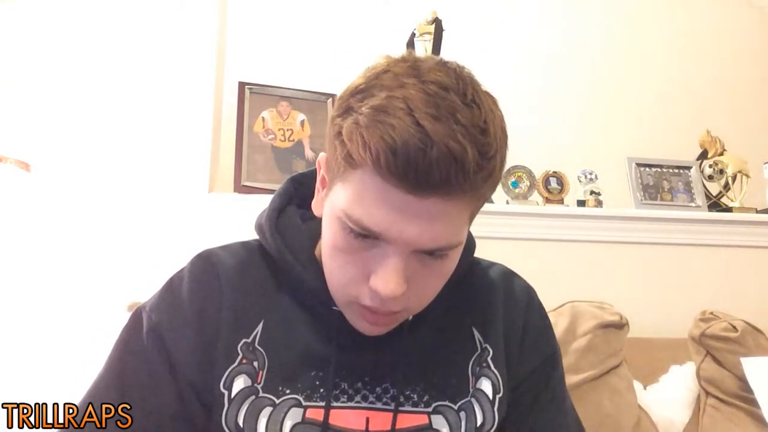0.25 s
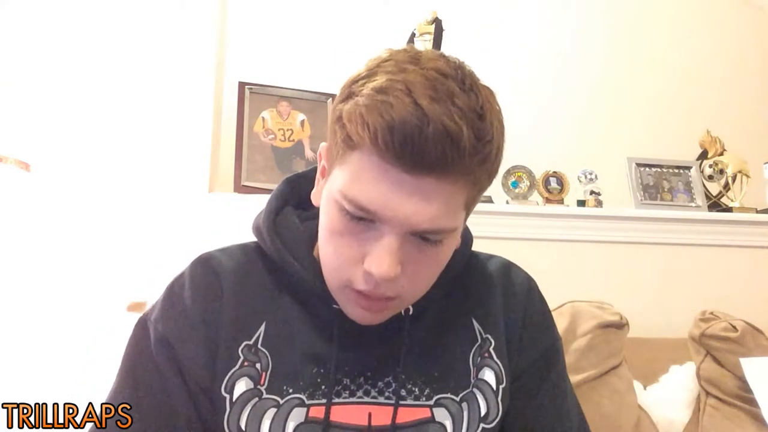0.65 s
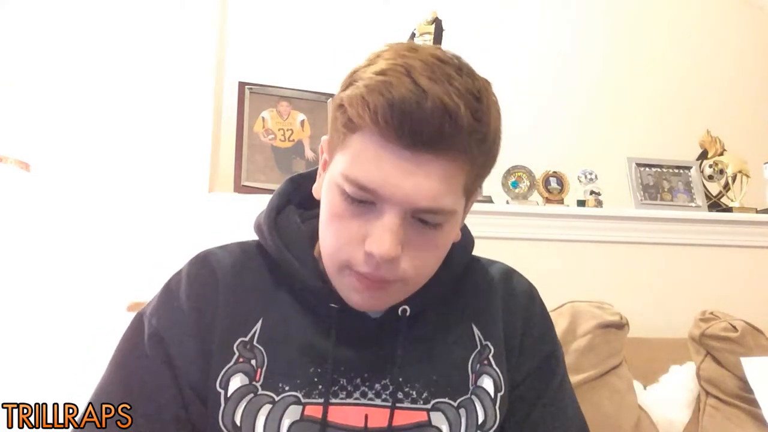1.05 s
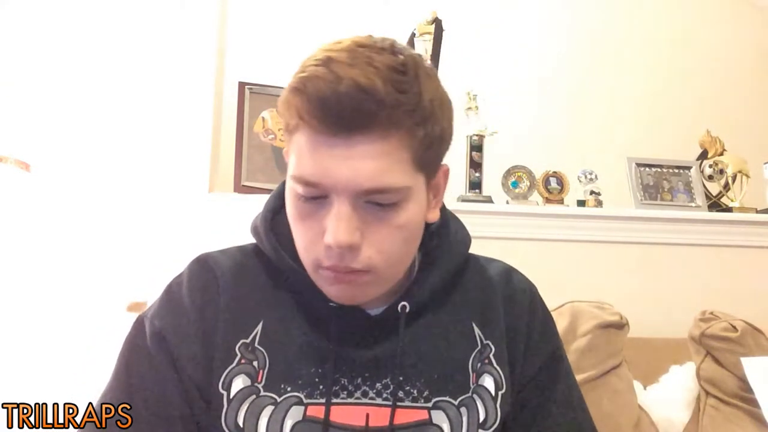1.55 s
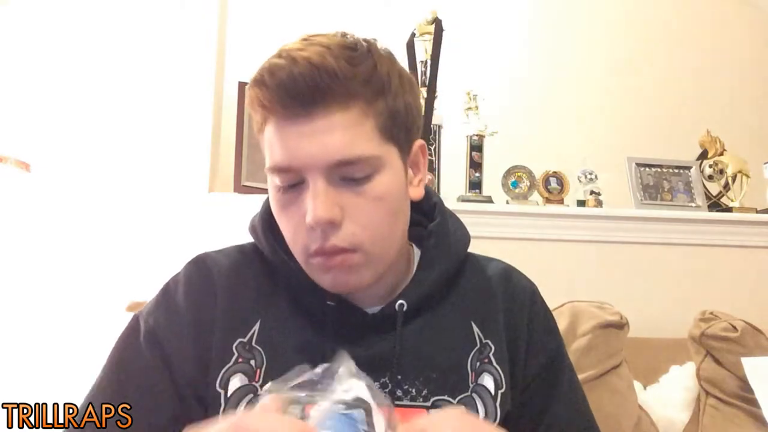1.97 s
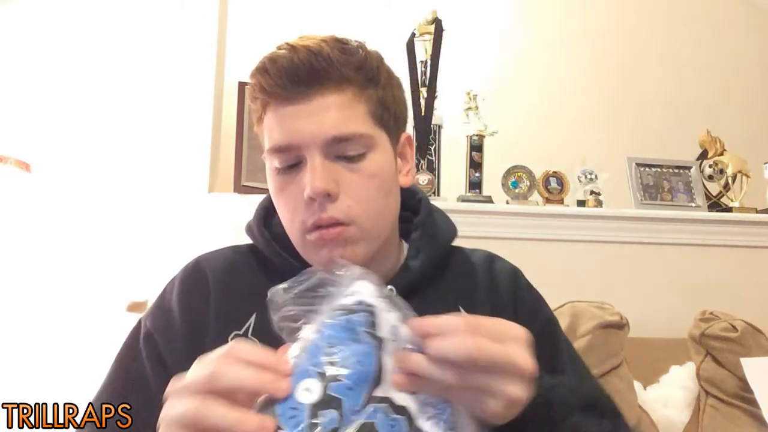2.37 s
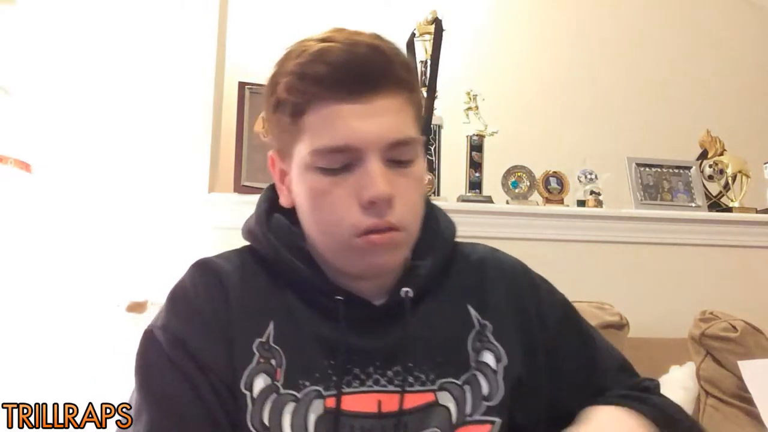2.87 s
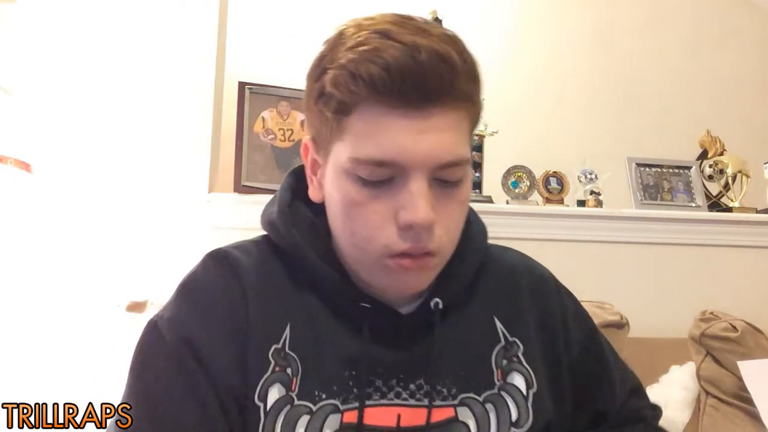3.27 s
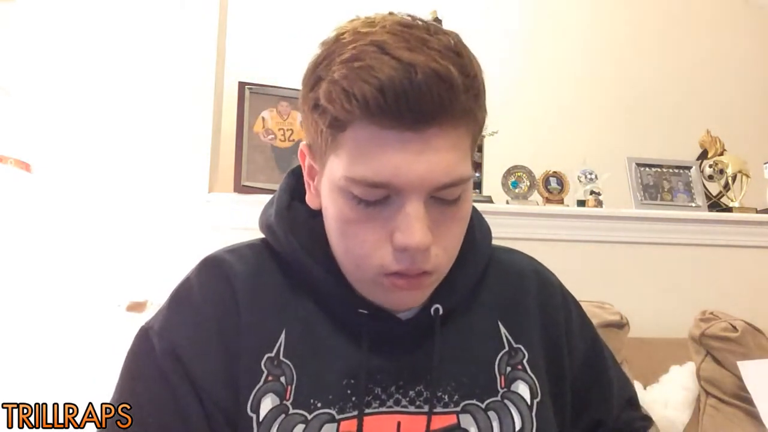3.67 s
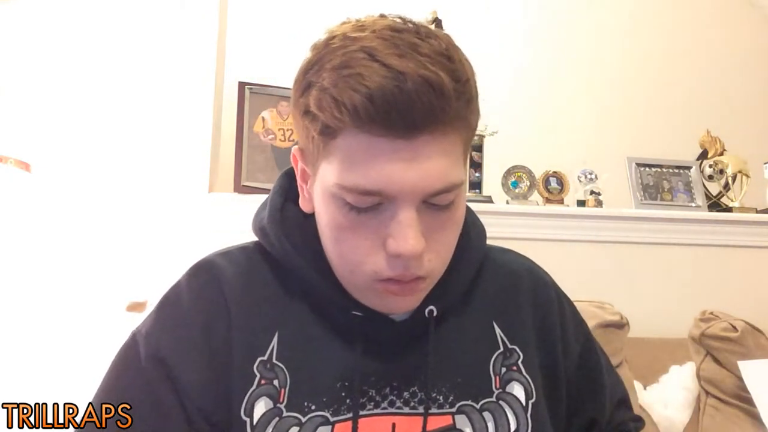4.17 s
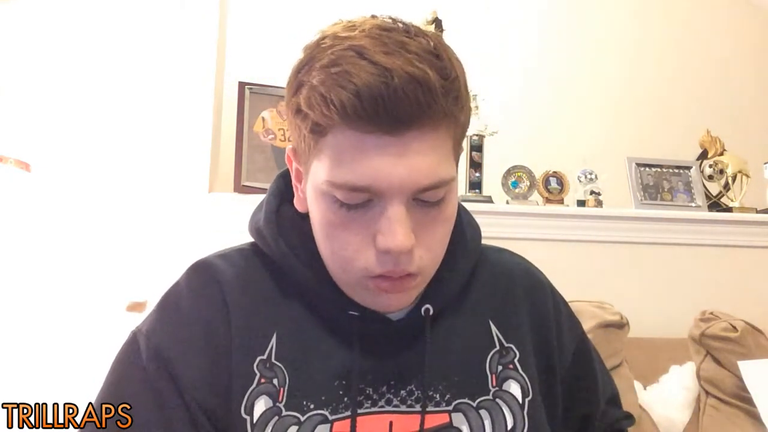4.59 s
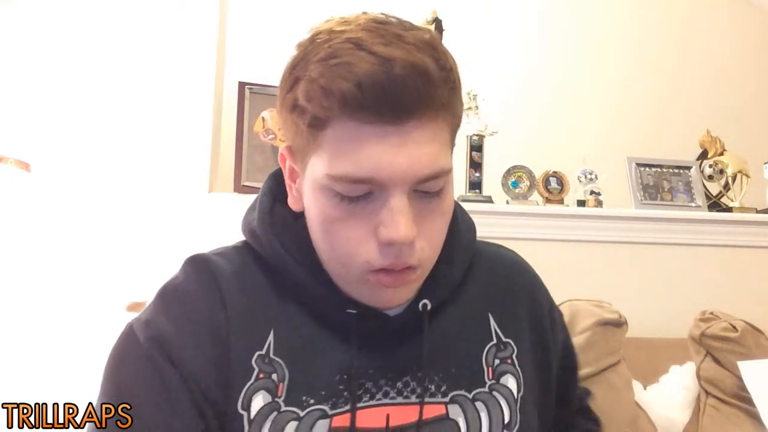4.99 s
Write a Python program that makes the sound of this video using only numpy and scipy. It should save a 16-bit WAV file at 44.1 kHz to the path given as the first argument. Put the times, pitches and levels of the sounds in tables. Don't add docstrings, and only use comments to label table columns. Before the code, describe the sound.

Brittle plastic film crackles irregularly within arm's reach in a furnished room with a short, faint reverberation. Sparse creases build to a sharp burst, a dense zipping tear follows, and contents knock dully as the bag is turned over. A peeling rustle leads into two crunchy squeezes with hollow thumps, before quiet fidgeting fades towards near stillness. Faint mains hum and microphone hiss stay underneath.

```python
import sys
import numpy as np
from scipy import signal
from scipy.fft import rfft, irfft
from scipy.io import wavfile

SR = 44100
rng = np.random.default_rng(int(sys.argv[2]) if len(sys.argv) > 2 else 0)


def invert_db(level):
    return 10 ** (np.asarray(level, dtype=float) / 20)


def output_pcm(signal):
    pcm = np.clip(np.atleast_2d(signal).T, -1, 1) * 32767
    wavfile.write(sys.argv[1], SR, np.round(pcm).astype(np.int16))


N = 230942

# [s, dB, dB, dB]
CREASES = [(0.0278, -28.5, -12, -26), (0.0914, -26, -6, -4.5), (0.1646, -30.5, 0, -7),
           (0.1836, -30, 0, -14.5), (0.2699, -39, 3, -11), (0.3294, -29.5, -3.5, -25.5),
           (0.4366, -14.5, -6.5, -41), (0.4753, -9.5, -7.5, -20.5), (0.5112, -6, -8, -28),
           (0.5902, -9.5, -19, -27), (0.6069, -14, -9.5, -36), (0.6566, -23.5, -0.5, -38),
           (0.6827, -39.5, 8, 11), (0.7247, -24.5, -7, -29), (0.7485, -23.5, -5, -38),
           (0.7726, -20, -21, -25), (0.7825, -6.5, -2, -18), (0.7867, 0, -2, -25), (0.9089, -18.5, -4, -13),
           (0.9836, -23.5, -19, -16.5), (1.0333, -31, 0.5, -16), (1.0542, -25, -12, -61),
           (1.1445, -17.5, 2, -2.5), (1.2197, -22.5, 5, -2), (1.2735, -27.5, 2.5, -21),
           (1.2963, -27, 0, -21), (1.3546, -29.5, -19, -11.5), (1.4371, -25, -26, -34),
           (1.4721, -20.5, -2, -30), (1.4939, -21, -6, -29),
           (1.7847, -9, 2.5, -3.5), (1.7946, -5, -6, -8), (1.812, -2, -10, -11), (1.8436, -5, -7.5, -12.5),
            (1.8975, -22, -17, -28), (1.9187, -8.5, 1, -7), (1.9667, -24, -20, -30), (1.979, -29, -7, -13),
            (2.0018, -28, -29, -6), (2.0767, -20.5, -23, -8), (2.1003, -25, -26, -11),
            (2.1055, -20, -7, -17.5), (2.1448, -28, 8.5, -7), (2.188, -30, -13, -10), (2.2088, -35, 1, -25),
            (2.2259, -32, -12, -24), (2.2388, -20.5, -1.5, -29), (2.2937, -35, -1, -2),
            (2.353, -28.5, -1.5, -10), (2.458, -26, 0, -29), (2.491, -25, -4, -34),
            (2.531, -24.5, 1.5, -16), (2.5974, -22, -29, -9.5), (2.6198, -21, -13, -19),
            (2.6803, -44, -2, -20), (2.7107, -28, -16, -22), (2.787, -31.5, -17, -6),
           (3.0742, -7, -17, -14.5), (3.083, -13, 4, -21), (3.1046, -16, -21, -40),
            (3.6363, -26, -15, -22), (3.6641, -4.5, -6, -26.5), (3.669, -12, -5, -24.5),
            (3.7915, -15.5, 4.5, -11.5), (3.9955, -28.5, 5.5, -5), (4.028, -24, -13, -19),
            (4.0334, -24, -15, -32), (4.0698, -35, -11, -23), (4.1226, -31.5, -20, -22),
            (4.139, -26.5, -1, -30), (4.1618, -24, -12, -19), (4.1787, -14.5, 1, -4.5),
            (4.2545, -31, -1, -19), (4.321, -26, -30, -26), (4.3582, -27.5, 6, -14), (4.639, -20.5, 5, 3),
            (4.7213, -35.5, -1, -19), (4.75, -35, -23, -11), (4.8134, -30.5, 10, -10),
            (4.9984, -42, -14, -1), (5.176, -26.5, -11, -26),
           (0.7587, -26, -20, -20), (0.7807, -1, 1, -20), (0.791, -4, -4, -11), (0.7961, -8, -2, -9),
        (0.806, -2, -1, -15.5), (0.81, -10, -5, -9), (0.8164, -4, -3.5, -13), (0.8244, -9.5, 6, -10),
        (0.8278, -5, -1, -4), (0.8381, -6.5, 2, -11), (0.862, -14.5, -6, -13), (1.733, -11, 0, -9),
        (1.7381, -4, -8, -21), (1.7517, -6, -6, -8.5), (1.7592, -5, -8, -11.5), (1.7647, -6, -1, -10),
        (3.124, -10, 1, -4.5), (3.1351, -4, -20, -13), (3.1467, -2.5, -11, -19),
        (3.1529, -15.5, 11.5, -1.5), (3.1643, -8, 0, -38), (3.1724, -6, -1, -4.5), (3.182, -9.5, 3, -2.5),
        (3.677, -16, -17, -22.5), (3.6826, -17, -7, -34), (3.689, -22, 0, -28),
           (0.078, -35, 2, -17), (0.2947, -38.5, 5, -16), (0.465, -25, -20, -28), (0.523, -27, -10.5, -27),
         (0.582, -28, -9.5, -26), (0.5967, -15, -20.5, -26), (1.136, -33.5, 5, 5), (1.207, -32, -1, 2.5),
         (1.259, -28, 2, -17), (1.5163, -33.5, 8.5, -8.5), (1.55, -31, -11, -29), (2.639, -33.5, 7, 4),
         (3.059, -34, 15, -0.5), (4.63, -30, 6, 2),
           (1.553, -16, -13, -40), (1.5586, -19.5, -15, -22), (1.5617, -13, -12, -39),
        (1.5652, -20.5, -4, -31), (1.5752, -13.5, -6, -45), (1.5774, -31, -7, -17), (1.5804, -20, -24, -32),
        (1.5864, -25, 5, -23), (1.5895, -27, -17, -31), (1.5942, -21, 4, -27), (1.6004, -12.5, -2, -32),
        (1.6066, -11, -21, -30), (1.611, -16, -21, -27), (1.616, -25, 10, -26), (1.6184, -9, -23, -28),
        (1.6251, -10, -1, -34), (1.6306, -4.5, -23, -26), (1.6342, -18, -5, -40), (1.6377, -12, -28, -20),
        (1.6451, -4, -17, -22), (1.65, -7, -9, -35), (1.6533, -10, 3, -30), (1.6561, -21, -15, -22),
        (1.659, -8, -10, -30), (1.6629, -17.5, -19, -25), (1.6668, -12, -6, -21), (1.6697, -18, 1, -31),
        (1.6731, -32, -7, -21), (1.6756, -15, 2, -36), (1.6798, -4, -4, -23), (1.685, -16, -3, -23),
        (1.6879, -12, -15, -27), (1.691, -18, -24, -31), (1.6942, -12, -22, -37), (1.6995, -6, -26, -27),
        (1.7028, -22, -21, -40), (1.7075, -12, -26, -32), (1.7105, -32, -10, -13), (1.7134, -22, 3, -9),
        (1.7157, -13, -17, -14), (1.721, -3.5, -13, -25), (1.7252, -21, 20, -8), (1.7448, -17, 14, -14),
        (1.767, -31, -4, -20), (1.7727, -15, -9, -15), (1.778, -30, -8, -15),
           (2.8006, -17, -22, -37), (2.8048, -19.5, -6.5, -28), (2.8117, -23, -7, -36), (2.818, -20, -10, -38),
        (2.8219, -24, -17, -36), (2.828, -23, -6, -32), (2.8323, -12.5, -6, -31), (2.839, -18.5, -15, -46),
        (2.842, -24, -15, -9), (2.8453, -19, 0, -11), (2.854, -21, -9, -29), (2.862, -19.5, -7, -23),
        (2.8732, -19.5, -11, -10), (2.8785, -18, -5, -14), (2.8808, -23, -9, -31), (2.8893, -15, -18, -19),
        (2.8981, -31, -15, -24), (2.9209, -18, -18, -27), (2.9264, -25, -6, -23), (2.9475, -11, -27, -20),
        (2.9542, -20, -4, -36), (2.9596, -25, -17, -28), (2.962, -12.5, -22, -34), (2.9652, -17, -21, -34),
        (2.9673, -16, -3, -29), (2.9723, -22, -18, -34), (2.976, -16, -5.5, -24), (2.9843, -15, -19, -21),
        (2.9882, -10.5, -18, -30), (2.9914, -18, -16, -33), (2.9935, -22, -14, -13), (2.9976, -21, -9, -37),
        (3.001, -21, -3, -20), (3.0057, -32, -10, -44), (3.0101, -21, -16, -28), (3.014, -20, -4, -22),
           (0.7993, 0, -0.5, -28), (0.803, -7, -2, -22), (0.8119, -17, -13, -27), (0.8184, -8, -1, -23),
         (0.8206, -12, -10, -37), (0.8315, -6, -1, -22), (0.835, -14, -6, -8), (0.8412, -14, 5, -15),
         (3.697, -7.5, -13, -25), (3.7025, -13, -19, -35), (3.706, -8, 1.5, -13), (3.71, -8, -8.5, -24),
         (3.7116, -19, -8, -20), (3.7142, -5, -6, -29), (3.718, -9.5, -0.5, -14), (3.7209, -14, -19, -30),
         (3.7244, -19, -9, 4), (3.7276, -10, -7, -12), (3.731, -15, -3, -13), (3.7352, -5, -4.5, -16),
         (3.7385, -16, -7, -26), (3.7425, -10, -3.5, -17), (3.7486, -11, -6.5, -6), (3.756, -16, 0, -19),
         (3.762, -13, 3.5, -15), (3.7642, -18, -17.5, -6), (3.7719, -18, -8, 0), (3.7762, -21, -10, -3),
         (3.782, -19, -7.5, -1), (3.7847, -24, -2, -15), (3.7871, -32, -14, -31), (3.796, -30, -4, -1),
         (3.7988, -27, -1, -8), (3.8003, -28, -12, -15), (3.8055, -32, 7, -27), (3.8078, -16.5, -2.5, -20),
         (3.8137, -29, -7, -3), (3.8152, -29, 8, -8),
           (1.9613, -26, -21, -22), (1.9849, -30, -8, -13), (2.0138, -24.5, -20, -15),
          (2.022, -28, -13, -26), (2.0409, -21, -16, -7), (2.0457, -28, -19, -10), (2.0957, -37, -15, -24),
          (2.1086, -28, 1, -9), (2.1196, -27, -12, -23), (2.129, -28, 3, -8), (2.1394, -31, 3, -17),
          (2.166, -25, -5, -6), (2.2424, -37, -3, -2), (2.2477, -22, -8, -15), (2.2521, -29, -8, -11),
          (4.3338, -33, -18, -16), (4.3406, -32, -13, -16), (4.3543, -24.5, -12, -33),
          (4.4467, -36, -9, -22), (4.451, -37, -8, -22), (4.459, -34, -5, -23), (4.4717, -38, -7, -6),
          (4.503, -39, -14, -13), (4.511, -28, -3, -12), (4.5203, -29, -11, -25), (4.5299, -34, -13, -22)]
# freq_hz [Hz], level_db [dB per Hz]
CRACK = [(2600, -5), (3500, -1.5), (5200, 0), (7600, -0.5), (8500, -12)]
# freq_hz [Hz], level_db [dB per Hz]
SIZZLE = [(7500, -8.5), (8600, 0.5), (11000, 1.5), (14500, 1.5), (16000, -4.5)]
# freq_hz [Hz], level_db [dB per Hz]
BODY = [(600, -9.5), (1000, -2.5), (1950, -1), (2600, -3.5), (3600, -5)]
# freq_hz [Hz], level_db [dB per Hz]
FULL_BAG = [(130, -14), (250, -5.5), (420, -3.5), (750, -3.5), (1100, -12)]
# freq_hz [Hz], level_db [dB per Hz]
EMPTY_BAG = [(120, -22), (210, -8), (345, 1), (470, -6), (700, -13), (1000, -28)]
SIZZLE_DB, SIZZLE_SPREAD_DB = -3.5, 1
SIZZLE_PER_AIR = -0.087


def snaps():
    creases = np.array(CREASES)
    start_s, crack_db, body_db, air_db = creases.T
    sizzle_db = SIZZLE_DB + SIZZLE_PER_AIR * (air_db - air_db.mean())
    sizzle_db = sizzle_db + SIZZLE_SPREAD_DB * rng.standard_normal(len(start_s))
    crack = bursts(CRACK, start_s, crack_db - 0.4, kick=7.5, fall_ms=1.0, late_ms=0.14)
    sizzle = bursts(SIZZLE, start_s, crack_db + sizzle_db, kick=5.0, fall_ms=1.0, late_ms=0.12)
    body = bursts(BODY, start_s, crack_db + body_db - 0.8, kick=7.4, fall_ms=1.0, late_ms=0.15)
    slack, puffed = [
        bursts(bag, start_s, crack_db + air_db - 3.0, kick=11.0, fall_ms=0.99, late_ms=0.33)
        for bag in (FULL_BAG, EMPTY_BAG)]
    return crack + sizzle + body + air_pocket(slack, puffed)


def bursts(spectrum, times, peaks_db, kick, fall_ms, late_ms):
    ms = np.arange(700) * 1000 / SR - late_ms
    chance = rng.standard_normal((len(times), 702))
    fall = fall_ms * np.exp(0.25 * chance[:, :1])
    source = chance[:, 2:] * np.exp(-np.abs(ms) / np.where(ms < 0, 0.08, fall))
    source[:, np.argmin(np.abs(ms))] = -kick * np.exp(0.45 * chance[:, 1])
    rows = signal.fftconvolve(source, kernel(spectrum)[None], axes=1)[:, :900]
    rows *= (invert_db(peaks_db) / np.abs(rows).max(axis=1))[:, None]
    out = np.zeros(N + 900)
    for start_s, row in zip(times, rows):
        at = round(start_s * SR)
        out[at:at + 900] += row
    return out[:N]


HOLLOW_START_S, HOLLOW_END_S = 2.95, 3.9


def air_pocket(slack, puffed):
    t = np.arange(N) / SR
    return np.where((t > HOLLOW_START_S) & (t < HOLLOW_END_S), puffed, slack)


def rustle():
    fine_db, body_db, air_db = effort_db()
    effort = np.clip((fine_db + 61.0) / 35, 0, 1)
    settling = np.clip(np.abs(np.gradient(fine_db)) * SR / 300, 0, 1)
    ticks_per_s = (240 + 600 * effort) * invert_db(3.1 * drift(25))
    born = rng.random(N) < ticks_per_s / SR
    size = np.minimum(rng.exponential(1, N), 2.3)
    sizes = born * invert_db(4.94 * (1.5 - 1.03 * effort) * size)
    keep = np.exp(-1000 / (0.4 * SR))
    parts = []
    for spectrum, hiss in zip((CRACK, SIZZLE, BODY, FULL_BAG, EMPTY_BAG), (0.47, 0.35, 0.83, 1.0, 1.0)):
        share = invert_db(2.7 * rng.standard_normal(N))
        ticks = rms_one(signal.lfilter([1], [1, -keep], sizes * share))
        envelope = (1 - 0.71 * settling) * ticks + hiss * invert_db(3.0 * drift(17.6))
        stir = envelope * rng.standard_normal(N)
        parts.append(rms_one(signal.fftconvolve(stir, kernel(spectrum))[:N]))
    crack, sizzle, body, slack, puffed = parts
    fine = invert_db(fine_db - 1.0) * (crack + invert_db(-2.5) * sizzle)
    return fine + invert_db(body_db + 2.38) * body + invert_db(air_db - 1.1) * air_pocket(slack, puffed)


# [dB, film body re ticks]
GRIPS = [(0.072, 0.06, 0.076, -58, -3), (0.447, 0.011, 0.057, -45, -2.5), (0.501, 0.0069, 0.02, -37, -11.5),
         (0.599, 0.033, 0.009, -28.5, -13.5), (0.783, 0.028, 0.047, -27, -1),
         (0.924, 0.046, 0.081, -52.5, -9.5), (1.138, 0.005, 0.0019, -51, -10),
         (1.225, 0.014, 0.052, -59, 0), (1.477, 0.13, 0.06, -48.5, -6.5), (1.65, 0.15, 0.13, -45, 4.5),
         (1.75, 0.23, 0.018, -46.5, 4), (1.848, 0.09, 0.017, -42.5, -0.5), (1.965, 0.03, 0.22, -53, 3),
         (2.229, 0.016, 0.0044, -39.5, 1.5), (2.457, 0.083, 0.04, -48, -3), (2.6, 0.062, 0.014, -56.5, 0),
         (2.804, 0.023, 0.076, -42.5, -3), (2.914, 0.046, 0.015, -44, -7),
            (2.986, 0.055, 0.027, -35, -8.5), (3.076, 0.041, 0.025, -39.5, -3.5),
            (3.145, 0.058, 0.038, -32, -0.5), (3.344, 0.063, 0.033, -50.5, -1.5),
            (3.613, 0.062, .03, -56.5, -0.5), (3.665, 0.005, 0.016, -38.5, -10),
            (3.695, 0.015, 0.11, -31.5, -1.5), (4.032, 0.064, 0.0017, -54.5, 0.5),
            (4.176, 0.05, 0.0042, -48.5, -1.5), (4.345, 0.078, 0.0025, -51, 1.5),
            (4.451, 0.091, 0.084, -51, 3), (4.625, 0.016, 0.012, -39.5, -1),
            (4.818, 0.0059, 0.0026, -53.5, 6), (5.002, 0.0073, 0.0028, -53, 3),
            (5.177, 0.0093, 0.036, -49, -5.5)]
# start_s [s], ticks_db [dB]
IDLE = [(0, -65), (0.41, -66), (0.75, -60), (1.19, -64.5), (1.42, -60.5), (2.75, -60.5), (3.3, -64.5),
        (3.48, -74), (3.94, -68), (4.4, -68), (4.6, -66.5), (5.24, -82)]
SLACK_DB, RELAX_DB_PER_S = -62, 287
IDLE_BODY_DB, IDLE_AIR_DB = 2.5, 2.5
GRIP_AIR_DB, HOLLOW_AIR_DB = -4, 1


def effort_db():
    t = np.arange(0, N, 16) / SR
    idle = invert_db(np.interp(t, *np.transpose(IDLE))) ** 2
    fine = idle
    body = idle * invert_db(2 * IDLE_BODY_DB)
    air = idle * invert_db(2 * IDLE_AIR_DB)
    for full_s, rise_s, hold_s, ticks_db, depth_db in GRIPS:
        air_db = GRIP_AIR_DB + HOLLOW_AIR_DB * (HOLLOW_START_S < full_s < HOLLOW_END_S)
        rising = (ticks_db - SLACK_DB) * np.maximum(full_s - t, 0) / max(rise_s, 0.002)
        relaxing = RELAX_DB_PER_S * np.maximum(t - full_s - hold_s, 0)
        power = invert_db(ticks_db - rising - relaxing) ** 2
        fine = fine + power
        body = body + power * invert_db(2 * depth_db)
        air = air + power * invert_db(2 * (depth_db + air_db))
    return [np.interp(np.arange(N) / SR, t, 10 * np.log10(power)) for power in (fine, body, air)]


# start_s [s], peak_db [dB], pitch_hz [Hz]
KNOCKS = [(1.812, -22, 405), (1.844, -27, 410), (1.9182, -27.5, 390), (1.982, -34, 377), (2.033, -39, 350),
          (2.041, -31, 365), (2.194, -37, 430), (2.211, -34, 410), (2.2267, -26, 443), (2.2385, -23.5, 405),
          (2.385, -39, 730), (3.731, -23, 355), (3.7924, -23, 324), (3.7925, -15, 960), (4.179, -38.5, 312),
          (4.475, -35.5, 477), (4.638, -24, 525), (4.639, -31.5, 251), (4.8135, -27.5, 304),
          (4.8135, -26, 655), (4.836, -38, 296), (4.8134, -31, 1020), (1.221, -32, 1550),
          (1.9194, -28, 1580), (3.1648, -15.5, 383), (0.787, -3.5, 1920)]
KNOCK_CYCLES = 10.9
KNOCK_THIN_HZ, KNOCK_SOFT_HZ = 151, 2500


def knocks():
    t = np.arange(round(0.1 * SR)) / SR
    out = np.zeros(N + SR)
    for start_s, peak_db, pitch_hz in KNOCKS:
        at = round(start_s * SR)
        decay = invert_db(peak_db - 60 * t * pitch_hz / KNOCK_CYCLES)
        out[at:at + len(t)] += decay * np.sin(2 * np.pi * pitch_hz * t)
    band = signal.butter(1, [KNOCK_THIN_HZ, KNOCK_SOFT_HZ], "band", fs=SR, output="sos")
    return signal.sosfilt(band, out[:N])


# delay_s [s], level_db [dB]
ECHOES = [
    (.0073, -34.5),
    (0.011, -16.5),
    (0.0193, -40),
]
ROOM_T60_S, ROOM_DB, WALL_CUT_HZ = 0.26, -17, 7900


def room(x):
    t = np.arange(round(0.4 * SR)) / SR
    white = rng.standard_normal(len(t))
    dull = signal.sosfilt(signal.butter(1, WALL_CUT_HZ, fs=SR, output="sos"), white)
    tail = dull + (white - dull) * np.exp(-t / 0.034)
    tail *= invert_db(-60 * t / ROOM_T60_S) * (1 - np.exp(-t / 0.0021))
    tail *= invert_db(ROOM_DB) / np.sqrt(np.sum(tail ** 2))
    for delay_s, level_db in ECHOES:
        tail[round(delay_s * SR)] += invert_db(level_db)
    return signal.fftconvolve(x, tail)[:N]


# freq_hz [Hz], level_db [dB per Hz]
RUMBLE = [(25, -7), (129, -11), (215, -11.5), (253, -14.5), (600, -26), (1530, -31), (5580, -48),
          (15500, -40)]
# start_s [s], level_db [dB]
LEAN = [
    (0, 3.5),
    (2.049, 3),
    (2.25, -0.5),
    (3.6, 0),
    (3.8, 2.5),
    (5.24, 4.5),
]
RUMBLE_DB, HUM_DB, HUM_HZ = -60, -64.5, 120


def background():
    white = rng.standard_normal(N + 4096)
    noise = rms_one(signal.fftconvolve(white, kernel(RUMBLE, size=4096))[4096:N + 4096])
    t = np.arange(N) / SR
    hum = np.sin(2 * np.pi * HUM_HZ * t + 0.5 * drift(2.5)) * invert_db(HUM_DB + 1.63 * drift(2.1))
    lean = invert_db(np.interp(t, *np.transpose(LEAN)))
    return lean * (invert_db(RUMBLE_DB) * noise + hum)


def rms_one(x):
    return x / np.sqrt(np.mean(x ** 2) + 1e-20)


def kernel(spectrum, size=1024):
    hz, db = np.transpose(spectrum)
    octave = np.log2(np.maximum(np.arange(2 * size + 1), 1) * SR / (4 * size))
    beyond = np.maximum(np.log2(hz[0]) - octave, 0) + np.maximum(octave - np.log2(hz[-1]), 0)
    gain = invert_db(np.interp(octave, np.log2(hz), db) - 13.1 * beyond)
    cepstrum = irfft(np.log(gain))
    cepstrum[1:2 * size] *= 2
    cepstrum[2 * size + 1:] = 0
    return irfft(np.exp(rfft(cepstrum)))[:size]


def drift(rate_hz):
    r = np.exp(-2 * np.pi * rate_hz / SR)
    return rms_one(signal.lfilter([1], [1, -2 * r, r * r], rng.standard_normal(N + SR))[SR:])


def scene():
    bag = snaps() + knocks()
    return (bag + room(bag) + rustle() + background())[None]


def roll_off(x):
    return signal.sosfilt(signal.butter(12, 16500, fs=SR, output="sos"), x)


def record(dry):
    thin = signal.sosfilt(signal.butter(3, 44, "high", fs=SR, output="sos"), dry)
    rounded = 1.2 * np.tanh(thin / 1.2)
    cut = signal.sosfilt(signal.ellip(8, 0.5, 32, 15350, fs=SR, output="sos"), rounded)
    return roll_off(cut)


dry = scene()
out = record(dry)
output_pcm(out)
```